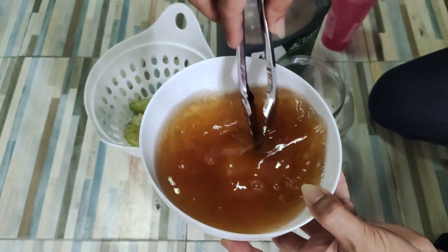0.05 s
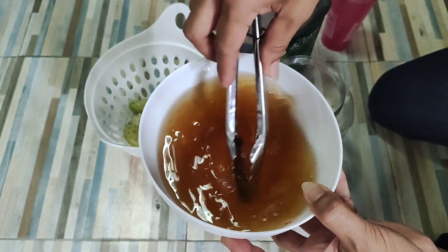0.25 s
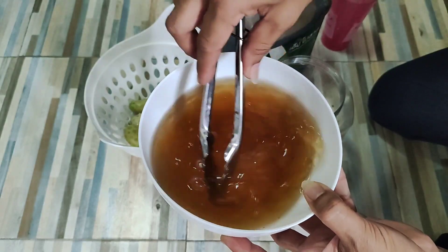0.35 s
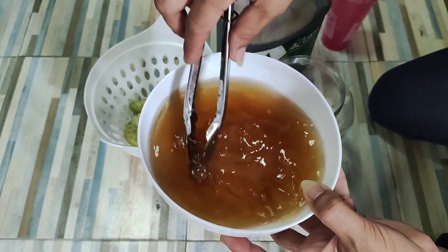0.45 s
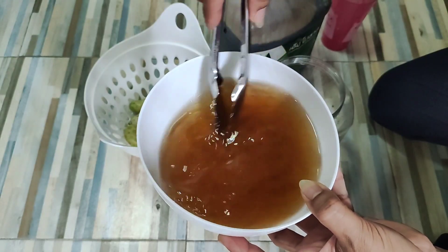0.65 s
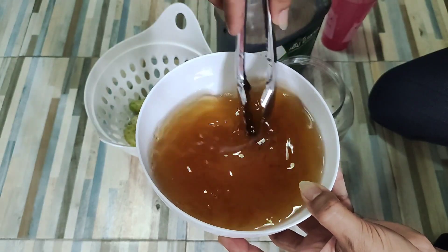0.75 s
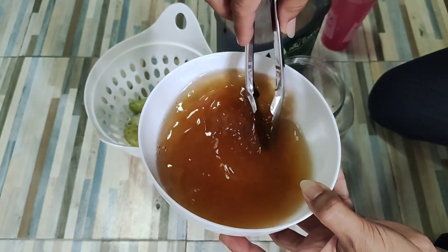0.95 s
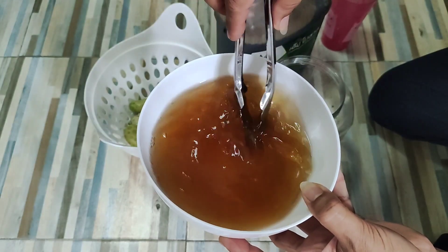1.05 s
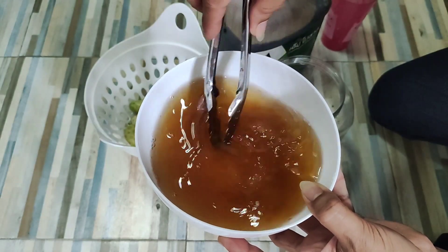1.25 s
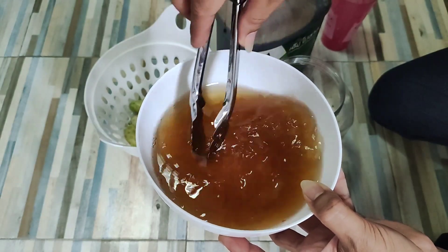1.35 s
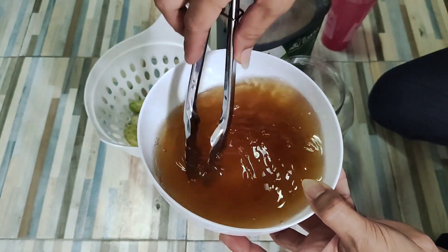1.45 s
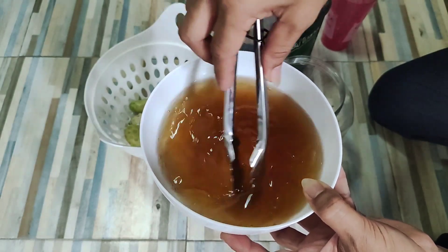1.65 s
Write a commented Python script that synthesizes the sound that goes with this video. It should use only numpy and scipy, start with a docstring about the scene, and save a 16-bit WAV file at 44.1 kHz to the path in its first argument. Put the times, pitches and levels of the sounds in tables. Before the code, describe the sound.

Metal tongs stir liquid in a plastic bowl with light scrapes, clicks and one bright ring

```python
"""Metal tongs stir syrupy water in a plastic bowl, close to a two-port microphone in a quiet kitchen.
The tips scrape, tap and skid on the wall: grit and noise bursts drive the bowl's modes and a treble fizz.
The liquid gurgles and blips in short rising rings, mostly fuzzy in the blips. The steel arms ring once
sharply as a set of fuzzy high modes, and the tips squeak once as a stack of overtones.
Kitchen air, a faint wavering hum and a short tail of reflections lie around it all."""
import sys
import numpy as np
from scipy import signal
from scipy.fft import rfft, irfft
from scipy.io import wavfile

SR = 44100
rng = np.random.default_rng(int(sys.argv[2]) if len(sys.argv) > 2 else 0)


def file_out(sig):
    """Save sig as 16-bit WAV at sys.argv[1]."""
    # one column per channel
    cols = np.atleast_2d(sig).T
    # limit, then scale
    lim = np.clip(cols, -1, 1)
    pcm = np.round(lim * 32767).astype(np.int16)
    wavfile.write(sys.argv[1], SR, pcm)


N = 74970

# Broad colour of anything touching the wall. Each row: frequency in Hz, level in dB.
WALL = [(290, -70), (500, 12), (578, -42), (784, -3), (1260, -5), (2430, 0.5), (5020, -18), (6420, -9.5),
        (9490, -17.5), (15100, -36), (16000, -17.5)]
TREBLE_HZ = 4400  # where the bowl's body hands over to its treble
LEFT_DB = -1.5  # left port against the right


def gain_of(db):
    """Amplitude factor of a level in dB."""
    return 10 ** (np.asarray(db) / 20)


def evened(x):
    """The signal scaled to an RMS of 1."""
    return x / np.sqrt(np.mean(x ** 2) + 1e-20)


def read(points, hz):
    """Level of a spectrum table at hz, interpolated over log frequency."""
    f, value = np.transpose(points)
    return np.interp(np.log(hz + 1), np.log(f + 1), value)


def curve(table, order, outside=None):
    """One column of a table over the whole time."""
    rows = np.array(table)
    return np.interp(np.arange(N) / SR, rows[:, 0], rows[:, order], outside, outside)


def resonate(x, hz, width):
    """A resonance of gain 1, width in Hz, that follows the pitch hz: shift to zero, smooth, shift back."""
    turn = np.exp(2j * np.pi * np.cumsum(hz * np.ones(len(x))) / SR)
    r = np.exp(-np.pi * width / SR)
    smooth = signal.lfilter([1 - r], [1, -r], x / turn + 1e-18)
    return 2 * (turn * smooth).real


def grit():
    """Tiny stick-slip clicks of uneven size and random sign, as the tips drag."""
    clicks_per_s, spread_db = 2500, 4.0
    sizes = gain_of(spread_db * np.minimum(rng.exponential(1, N), 5))
    signs = rng.choice([-1., 1.], N)
    return evened(sizes * signs * (rng.random(N) < clicks_per_s / SR))


def contacts(table, rise_s, trim_db):
    """A tick and a rattling burst each, as drives for body, boom, treble level and thud."""
    boom_lift_db, treble_lift_db, thud_lift_db = 2.5, 9, 5
    tick_db, tick_s, push_s = 4.5, 0.000086, 0.00041
    drive, t = np.zeros((4, N + 3000)), np.arange(3000) / SR
    rattles = rng.choice([-1., 1.], (len(table), 3000))
    for (s, db, boom_db, treble_db, thud_db, fade), rattle in zip(table, rattles):
        level_db = db + trim_db
        shape = np.minimum(t / rise_s, np.exp(-(t - rise_s) / fade)) * gain_of(level_db)
        burst = rattle * shape
        tick = gain_of(level_db + tick_db) * np.exp(-t / tick_s)
        push = np.exp(-t / push_s) * gain_of(db + thud_db + thud_lift_db)
        at = round(s * SR)
        drive[:, at:at + len(t)] += [
            burst + tick,
            burst * gain_of(boom_db + boom_lift_db),
            shape * gain_of(treble_db + treble_lift_db),
            push]
    return drive[:, :N]


def bowl_response():
    """Causal ring of the bowl: broad colour plus wall modes, split in body, treble and top."""
    # Wall modes. Each row: frequency in Hz, width in Hz, level in dB before the common lift.
    wall_modes = [(573, 180, -14.5), (1192, 123, -6), (1410, 25, -9), (1609, 150, -9.5), (1885, 48, -6),
                  (2397, 41, -1.5), (2490, 22, -10), (2787, 166, -5.5), (3207, 206, -5), (3694, 73, -9),
                  (4072, 29, -10.5)]
    modes_lift_db, boom_hz, top_hz = 9, 950, 9300
    hz = np.abs(np.fft.fftfreq(8192, 1 / SR))
    modes = sum(gain_of(db + modes_lift_db) ** 2 / (1 + (2 * (hz - f) / width) ** 2)
                for f, width, db in wall_modes)
    power = gain_of(read(WALL, hz)) ** 2 + modes
    # shares of the power above each edge
    body, high, top = (1 / (1 + (edge / (hz + 1)) ** steep)
                       for edge, steep in ((boom_hz, 5), (TREBLE_HZ, 12), (top_hz, 12)))
    out = []
    for share in (body - high, high - top, top):
        log = .5 * np.log(power * np.abs(share) + 1e-9)
        # minimum phase: the ring starts at the contact
        ring = np.fft.ifft(np.exp(log - 1j * signal.hilbert(log).imag)).real[:4096]
        out.append(ring / np.linalg.norm(ring))
    return out


def gurgles():
    """Short rising rings of many sizes and places as liquid swirls around the tips."""
    per_s, spread_db, pitches = 350, 12, 30
    cycles_typical, vary, glide = 17, 0.24, 0.033
    low_hz, high_hz, pan_db = 900, 3820, 13
    out = np.zeros((2, N))
    for hz in np.geomspace(low_hz, high_hz, num=pitches):
        cycles = cycles_typical * np.exp(vary * rng.uniform(-2.8, 1.5))
        u = np.arange(0, 3 * cycles, hz / SR) / cycles
        ring = u * np.exp(-3 * u) * np.sin(2 * np.pi * cycles * (u + glide * u ** 2))
        ring = ring / np.linalg.norm(ring)
        sizes = gain_of(spread_db * np.minimum(rng.exponential(1, N), 3))
        starts = sizes * (rng.random(N) < per_s / pitches / SR)
        place_db = LEFT_DB / 2 + pan_db * rng.uniform(-1.06, 1, N)
        placed = starts * gain_of([place_db, -place_db])
        out += gain_of(read(WALL, hz)) * signal.oaconvolve(placed, ring[None])[:, :N]
    return evened(out)


def bowl():
    """Scraping grit, taps and skids drive the bowl; returns its body and its two-port fizz with gurgles."""
    # Tips dragging on the wall. Each row: time in seconds, level in dB, then bowl boom, treble and
    # top in dB re that level.
    scrapes = [(0.0, -46, -26, -4.5, -1), (0.088, -56, -23, 7.5, 11), (0.122, -51, -13, 8, 5),
               (0.146, -53.5, -14, 14.5, 15.5), (0.194, -47, -7.5, 0.5, 3), (0.222, -43.5, -11.5, 16, 14.5),
               (0.274, -44, -13.5, -4, 2.5), (0.33, -54.5, -7, 13, 17), (0.35, -39.5, -4.5, -4, -2.5),
               (0.406, -49.5, -9.5, -1.5, 3.5), (0.468, -43, -4, -1, -1.5), (0.614, -61.5, -2, -3, 0),
               (0.624, -50, -27, -14, -2.5), (0.724, -47, -11, -3.5, 3), (0.756, -55.5, -10, 2, 11),
               (0.846, -34.5, -23, -1.5, -4.5), (0.89, -46, -2.5, -1.5, -9), (0.966, -48.5, -4.5, -9.5, -4),
               (1.046, -59, -10, 8.5, 12), (1.122, -49.5, -3.5, -0.5, 2.5), (1.174, -60, -36, 7, 6.5),
               (1.188, -50, 3, -11, 8), (1.216, -52.5, -39, 9.5, 1), (1.254, -55, -14, 2.5, 8.5),
               (1.372, -52, -31, -4.5, -2.5), (1.448, -62.5, -45, -3, -11), (1.524, -54.5, -24, 7, 12),
               (1.594, -66.5, -32, -2, 2), (1.624, -55, -2, 5.5, 10), (1.7, -52, -44, -2.5, 5.5)]
    # Taps on the wall. Each row: start in seconds, peak in dB before the trim, boom, treble and thud
    # in dB re the peak before their lifts, fade in seconds.
    taps = [(0.002, -32.5, -1.5, -31, -23.5, 0.0052), (0.102, -42.5, -23, 2, -26, 0.0085),
            (0.173, -31, -19, -7, -36, 0.0072), (0.347, -34.5, -5, -9, -17, 0.0088),
            (0.454, -22.5, 4.5, -17, -32, 0.0034), (0.509, -30.5, 2.5, -18, -31, 0.0022),
            (0.684, -30, -16, -17, -35, 0.0056), (0.725, -37, -33, -25, -43, 0.0026),
            (0.733, -25.5, 1, -19, -45, 0.0014), (0.757, -32.5, 6.5, -15, -19.5, 0.0032),
            (0.867, -13, -17, -18.5, -37.5, 0.0051), (0.925, -25, -1.5, -27, -32, 0.001),
            (0.968, -29, -3.5, -38, -28.5, 0.0032), (0.99, -30.5, -0.5, -11, -24.5, 0.0015),
            (1.257, -30.5, -1, -12, -47, 0.0025), (1.276, -29, -8.5, -40, -55, 0.0033),
            (1.399, -33.5, -41, -18, -56, 0.0072), (1.533, -29.5, -39, -18, -50, 0.0066),
            (1.623, -30.5, -34, -26, -16.5, 0.002)]
    # Short skids along the wall, slower to rise. Each row: the same columns as the taps.
    skids = [(0.031, -35.5, -36, -15.5, -26.5, 0.0053), (0.112, -33.5, -10.5, -4.5, -25.5, 0.0043),
             (0.18, -29, -2, -12.5, -26, 0.0011), (0.239, -32, -22, -36, -18, 0.0035),
             (0.404, -34.5, -36, -10.5, -20, 0.024), (0.626, -27.5, -12.5, -21.5, -42, 0.0033),
             (0.656, -40, -4.5, -14.5, -40, 0.0082), (0.787, -32.5, -17, -19, -26, 0.015),
             (0.802, -20.5, -13.5, -21.5, -41, 0.0061), (1.084, -41, -14, -15, -41, 0.0065),
             (1.189, -33, -25, -9, -31, 0.0019), (1.485, -34, -12, -5, -33, 0.0041),
             (1.523, -35, -18, -11, -39, 0.011), (1.667, -40.5, -31, -21, -24, 0.014)]
    # The lowest bowl mode moves as the liquid sloshes. Each row: time in seconds, pitch in Hz.
    slosh = [(.05, 780), (.12, 1100), (.19, 1000), (.3, 785), (.84, 785), (.93, 1000), (1.0, 1020),
             (1.05, 790), (1.7, 790)]
    boom_width, boom_skirt = 85, 450  # Hz
    thud_hz, thud_width = 328, 87
    treble_same, gurgle_db = 0.11, -5  # share common to both ports; dB re the scrape level

    level_db, drag = curve(scrapes, order=1), grit()
    level = gain_of(level_db)
    tapping = contacts(taps, rise_s=0.00079, trim_db=-8.5)
    skidding = contacts(skids, rise_s=0.0046, trim_db=-6.5)
    hit, knock, bright, thud = tapping + skidding
    body, treble, top = bowl_response()

    boom_hz = curve(slosh, order=1)
    boom_drive = knock + gain_of(level_db + curve(scrapes, order=2)) * drag
    boom = resonate(resonate(boom_drive, boom_hz, boom_width), boom_hz, boom_skirt)
    ring = signal.oaconvolve(hit + level * drag, body)[:N]
    ring += boom * np.sqrt(SR / (np.pi * boom_width))
    ring += resonate(resonate(thud, thud_hz, thud_width), thud_hz, 3 * thud_width) * 10

    shared, left, right = rng.standard_normal((3, N))
    noise = treble_same * shared + np.sqrt(1 - treble_same ** 2) * np.array([left, right])
    fizz = np.zeros((2, N))
    for column, band in ((3, treble), (4, top)):
        strength = bright + gain_of(level_db + curve(scrapes, order=column))
        fizz += signal.oaconvolve(noise * strength, band[None])[:, :N]
    return ring, fizz + gain_of(level_db + gurgle_db) * gurgles()


def air():
    """Steady kitchen noise, partly shared by both ports."""
    # Colour of the air noise. Each row: frequency in Hz, relative level in dB.
    colour = [(20, 11), (107, 3.5), (301, 4), (642, -9), (802, 4), (923, -70), (2750, -2), (4540, -65),
              (6720, -6), (9400, -21), (13500, -9), (14700, -12), (16000, -3.5)]
    level_db, same = -55, 0.29
    a, b = rfft(rng.standard_normal((2, N)))
    ports = np.array([a, same * a + np.sqrt(1 - same ** 2) * b])
    ports = ports * gain_of(read(colour, np.fft.rfftfreq(N, 1 / SR)))
    return gain_of(level_db) * evened(irfft(ports, N))


def hum():
    """A faint low hum of constant level whose pitch wavers: the phase of narrow noise."""
    hz, width, level_db = 62, 14, -69.5
    fuzzy = resonate(resonate(rng.standard_normal(N), hz, width), hz, width)
    return gain_of(level_db) * np.sqrt(2) * np.cos(np.angle(signal.hilbert(fuzzy)))


def blips():
    """Swirling liquid blips: each swells and fades on a slightly rising pitch, a faint tone inside fuzz."""
    # Each row: start in seconds, length in seconds, pitch in Hz, level at the swell's top in dB.
    swirls = [(0.084, 0.052, 2723, -46), (0.102, 0.045, 1880, -54), (0.158, 0.03, 3415, -44),
              (0.17, .03, 1048, -50.5), (0.209, .04, 3600, -45.5), (1.047, 0.017, 2354, -53.5),
              (1.081, .012, 2510, -47.5), (1.12, 0.043, 1657, -54), (1.226, 0.042, 2873, -48.5)]
    glide, width = 0.035, 0.076  # rise over the blip and resonator width, as shares of the pitch
    fuzz_share = 1.27  # noise against the clear tone
    out = np.zeros(N)
    for (s, length, hz, db), noise in zip(swirls, rng.standard_normal((len(swirls), 4096))):
        u = np.arange(0, 1, 1 / (length * SR))
        pitch = hz * (1 + glide * (u - .5))
        fuzz = evened(resonate(resonate(noise[:len(u)], pitch, width * hz), pitch, width * hz))
        tone = np.sin(2 * np.pi * np.cumsum(pitch) / SR)
        swell = gain_of(db) * np.sin(np.pi * u)
        out[round(s * SR):][:len(u)] += swell * (tone + fuzz_share * fuzz)
    return out


def arms():
    """The hinge rub rings each steel mode fuzzily, tones in step at the snap; each faces the ports its own way."""
    # Pitches of the steel modes in Hz.
    mode_hz = [4388, 4452, 4510, 6708, 6779, 6848, 6912, 8078, 8878, 9082, 12700, 13342]
    # One row per pitch. Each row: level in dB, left-right balance in dB, left lead in radians.
    facings = [(-5.5, -26, 0.9), (2, -2, 0.51), (-11.5, -27, 1.3), (-12, -13, 0.84), (-3, -14, 1.6),
               (-3.5, -21, 0.83), (-12, -8, 1.3), (-12, -12, 2.3), (-1, 6, 3.2), (-8, 23.5, 2.6),
               (-24, 4, 1.4), (-7, -4, 1.8)]
    # Arms rubbing at the hinge. Each row: time in seconds, low modes in dB, high modes in dB.
    rub = [(.202, -67, -78), (.207, -43, -42), (.218, -28.5, -32), (.228, -28, -29.5), (.236, -28, -35),
           (.241, -79, -47), (.28, -52, -52), (.32, -59.5, -51), (.42, -71, -57)]
    fuzz_share, width = 0.95, 0.021  # noise against the tone; resonator width as a share of the pitch
    snap_s, high_fade_db_per_s = 0.22, 65  # the high modes die faster after the snap
    hiss_db = 1.5  # re the high modes' rub

    low, high = (gain_of(curve(rub, order=k, outside=-120)) for k in (1, 2))
    out, t = np.zeros((2, N)), np.arange(N) / SR - snap_s
    fading = high * gain_of(-high_fade_db_per_s * np.maximum(t, 0))
    for hz, (db, pan_db, lead) in zip(mode_hz, facings):
        fuzz = evened(resonate(resonate(rng.standard_normal(N), hz, width * hz), hz, width * hz))
        tone = signal.hilbert(np.sqrt(2) * np.cos(2 * np.pi * hz * t) + fuzz_share * fuzz)
        facing = gain_of([[db + pan_db / 2], [db - pan_db / 2]]) * np.exp([[1j * lead], [0]])
        level = low if hz < TREBLE_HZ * 1.1 else fading
        out += level * (facing * tone).real
    band = signal.butter(2, [3500, 11000], "band", fs=SR, output="sos")
    hiss = signal.sosfilt(band, rng.standard_normal((2, N)))
    return out + high * gain_of(hiss_db) * evened(hiss)


def squeak():
    """The tips squeak on the wall: overtones on a stick-slip pitch, each a clear tone with a fuzzy halo."""
    # Each row: time in seconds, pitch in Hz, level in dB before the overtone levels.
    glide = [(.78, 1310, -46), (.812, 1303, -44), (.822, 1597, -49), (.84, 1639, -34), (.846, 1617, -31.5),
             (.87, 1630, -32.5), (.88, 1640, -65)]
    # Levels in dB by multiple of the pitch, from the fundamental up.
    overtones_db = [-11, 5, -13]
    fuzz_share, fuzz_width = 0.76, 220  # noise against the clear tone; Hz
    hz, level = curve(glide, order=1), gain_of(curve(glide, order=2, outside=-120))
    turn = 2 * np.pi * np.cumsum(hz) / SR
    stack = np.zeros(N)
    for k, db in enumerate(overtones_db, 1):
        fuzz = evened(resonate(rng.standard_normal(N), hz * k, fuzz_width))
        stack += gain_of(db) * evened(np.sqrt(2) * np.cos(k * turn) + fuzz_share * fuzz)
    return level * stack


def kitchen(x):
    """A short tail of sparse, decaying, dulled reflections, different in each port."""
    t60_s, dull_hz = 0.24, 5440
    t = np.arange(SR // 3) / SR
    signs = rng.choice([-1., 1.], (2, len(t)))
    echoes = signs * (rng.random((2, len(t))) < .05)
    tail = echoes * gain_of(-60 * t / t60_s) * (t > .002)
    tail = signal.lfilter(*signal.butter(1, dull_hz, fs=SR), tail)
    tail = tail / np.linalg.norm(tail, axis=1, keepdims=True)
    return signal.fftconvolve(x, tail, axes=1)[:, :N]


def scene():
    """Tongs, bowl and liquid at the two ports, with the kitchen's tail, air and hum."""
    left_lag_s, room_db = 3 / SR, -10.5
    body, fizz = bowl()
    near = body + squeak() + blips()
    lag = np.exp(-2j * np.pi * np.fft.rfftfreq(N, 1 / SR) * left_lag_s)
    left = gain_of(LEFT_DB / 2) * irfft(rfft(near) * lag, N)
    right = gain_of(-LEFT_DB / 2) * near
    ports = np.array([left, right]) + fizz + arms()
    return ports + gain_of(room_db) * kitchen(ports) + air() + hum()


def record(dry):
    """The band limit of the recorder: a steep low-pass."""
    edge_hz = 15750
    lowpass = signal.firwin(511, edge_hz, window=("kaiser", 9), fs=SR)
    return signal.oaconvolve(dry, lowpass[None], "same")


dry = scene()
out = record(dry)
file_out(out)
```